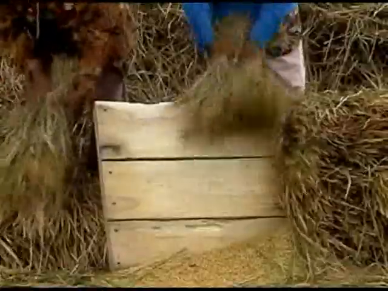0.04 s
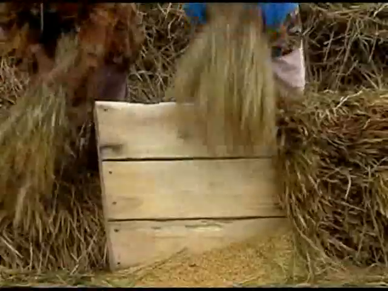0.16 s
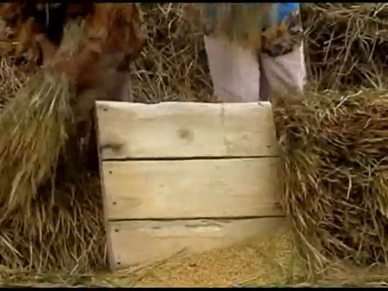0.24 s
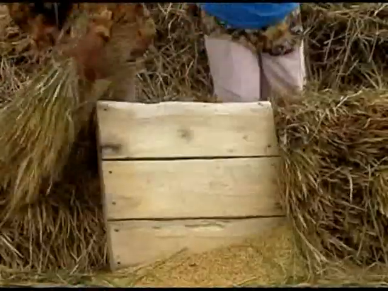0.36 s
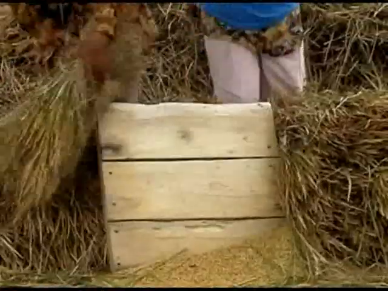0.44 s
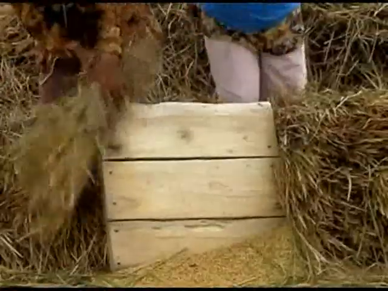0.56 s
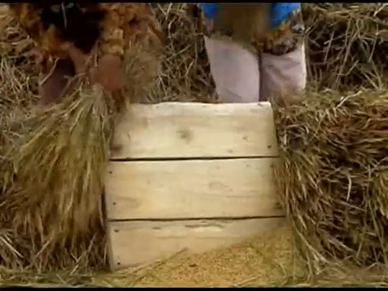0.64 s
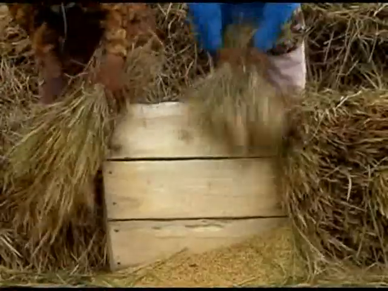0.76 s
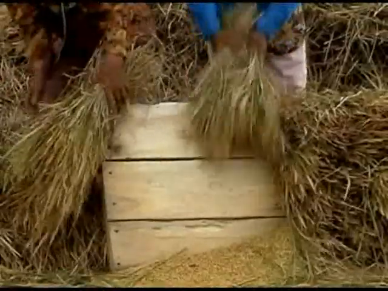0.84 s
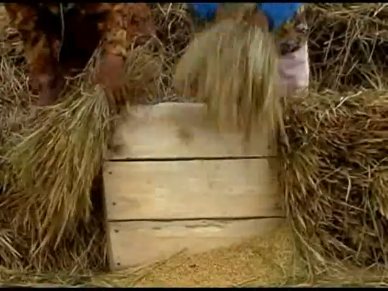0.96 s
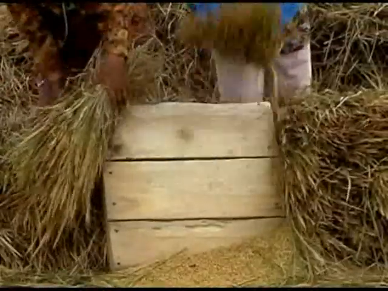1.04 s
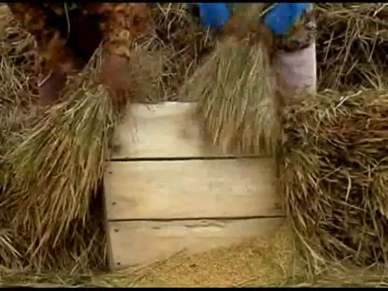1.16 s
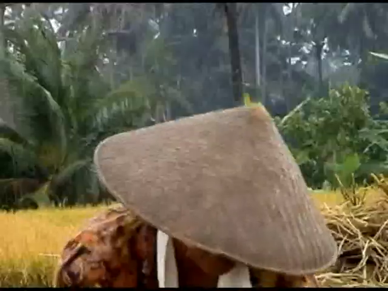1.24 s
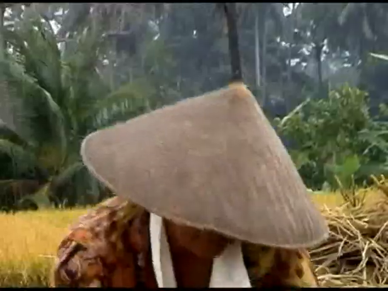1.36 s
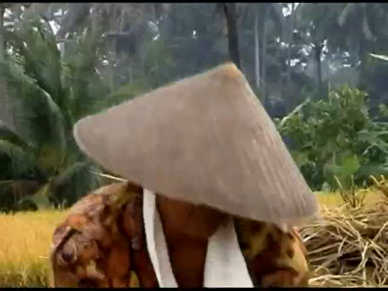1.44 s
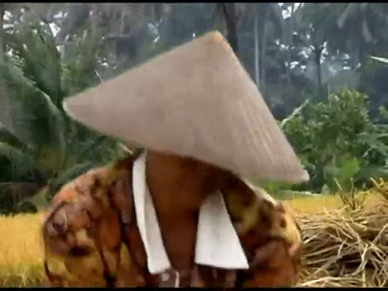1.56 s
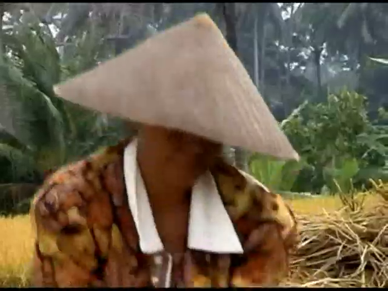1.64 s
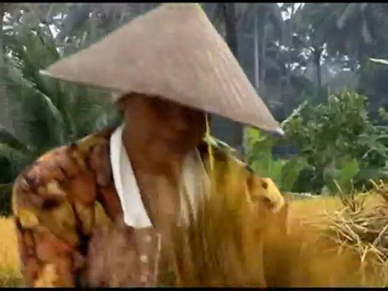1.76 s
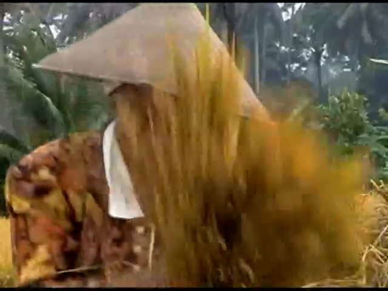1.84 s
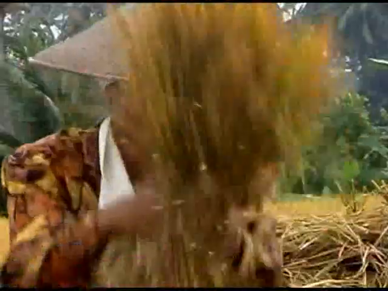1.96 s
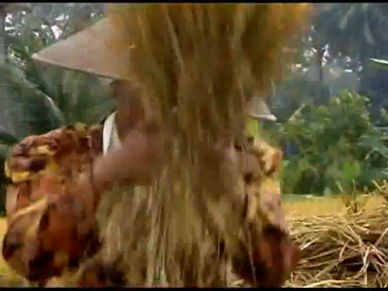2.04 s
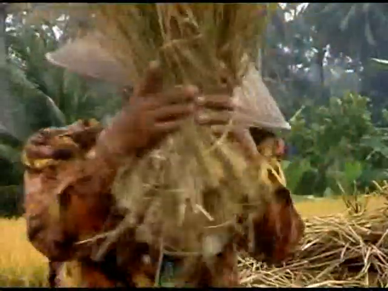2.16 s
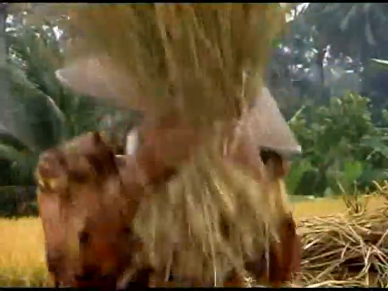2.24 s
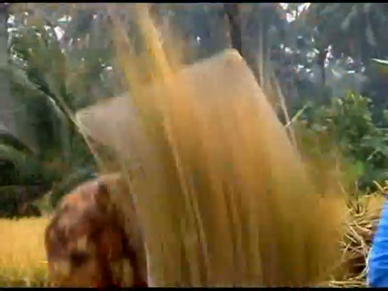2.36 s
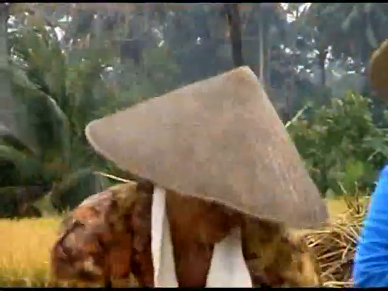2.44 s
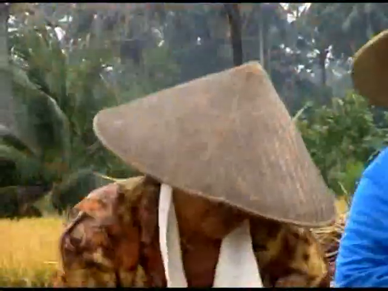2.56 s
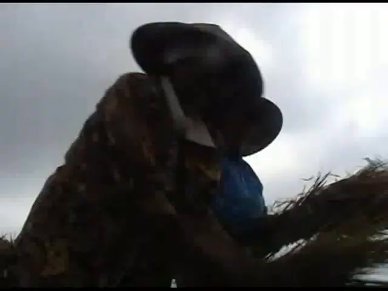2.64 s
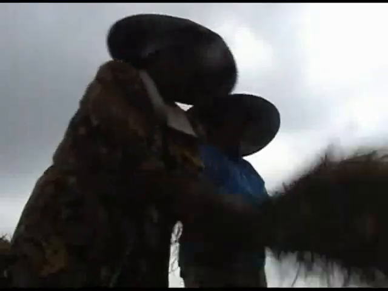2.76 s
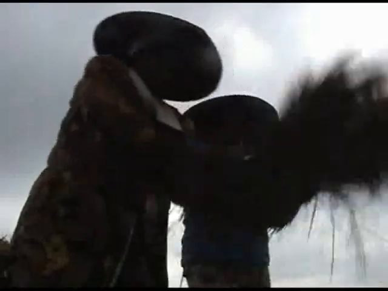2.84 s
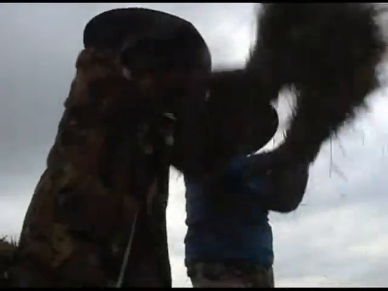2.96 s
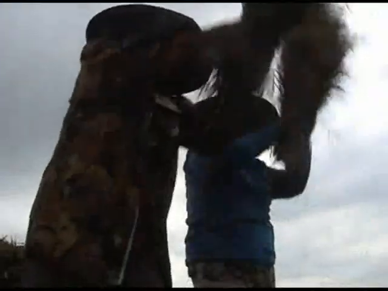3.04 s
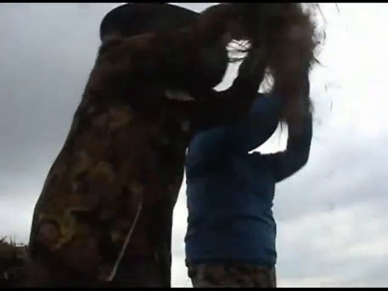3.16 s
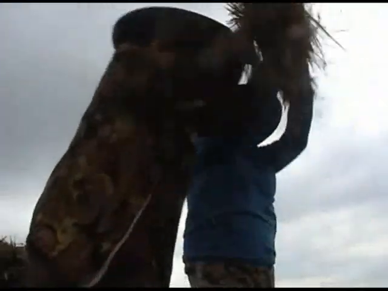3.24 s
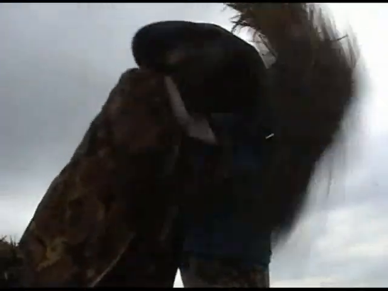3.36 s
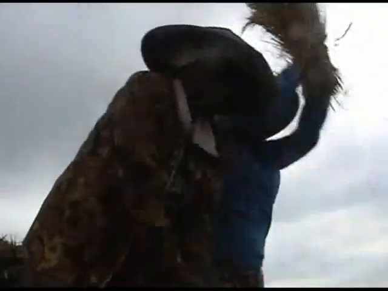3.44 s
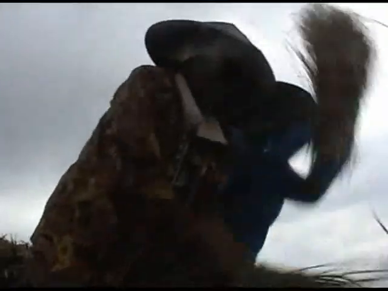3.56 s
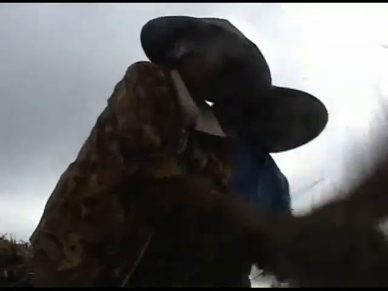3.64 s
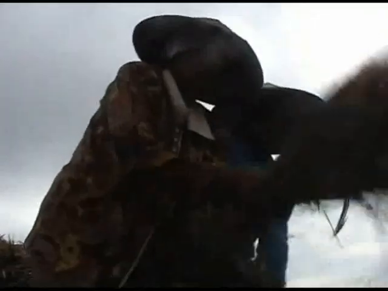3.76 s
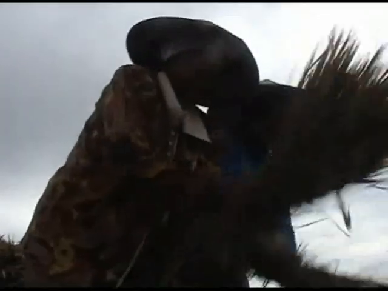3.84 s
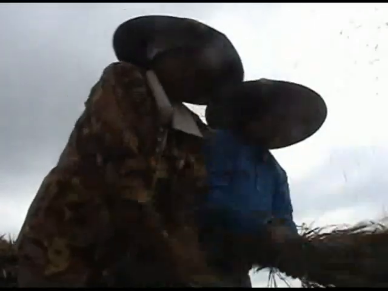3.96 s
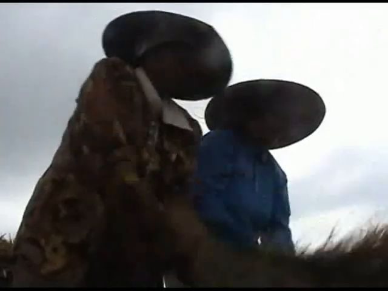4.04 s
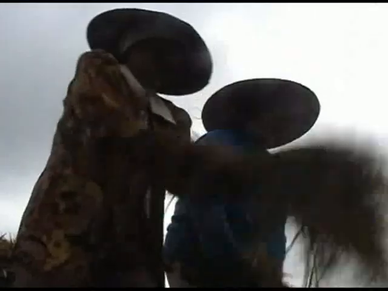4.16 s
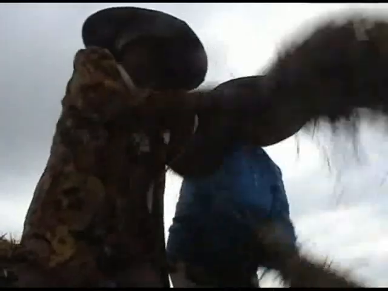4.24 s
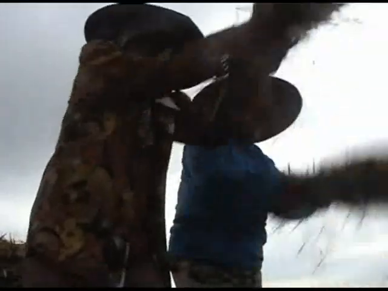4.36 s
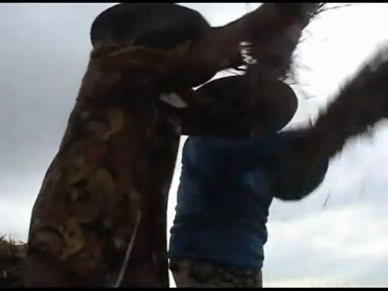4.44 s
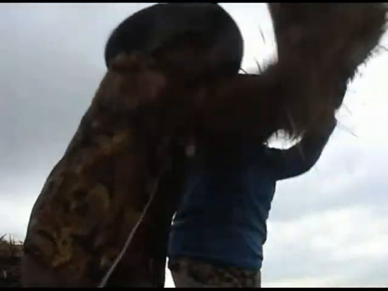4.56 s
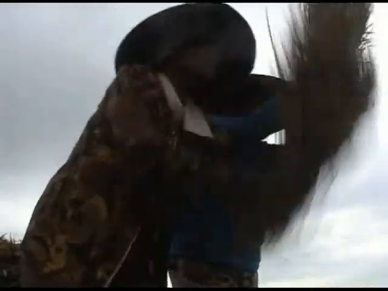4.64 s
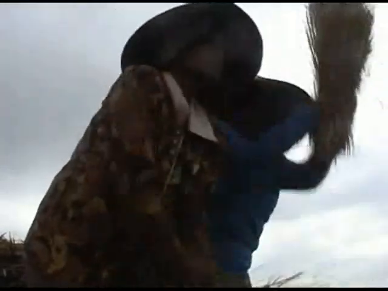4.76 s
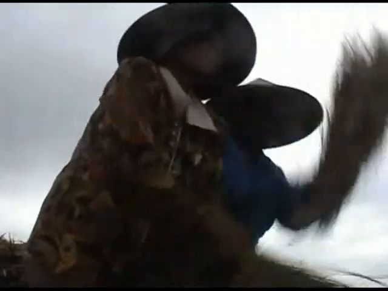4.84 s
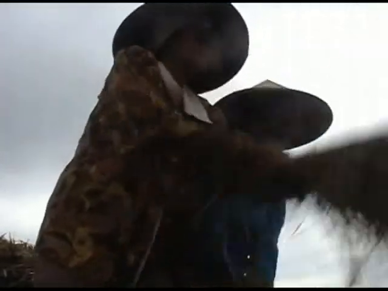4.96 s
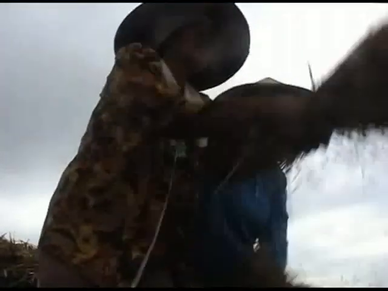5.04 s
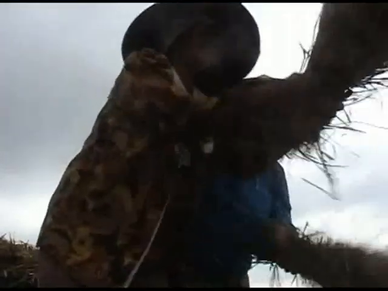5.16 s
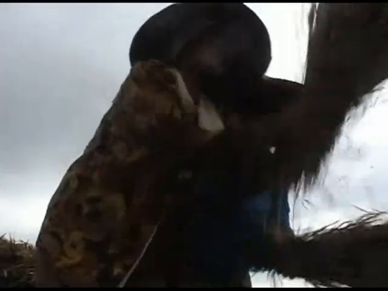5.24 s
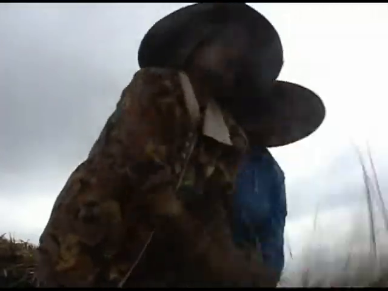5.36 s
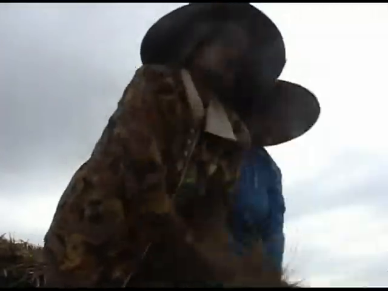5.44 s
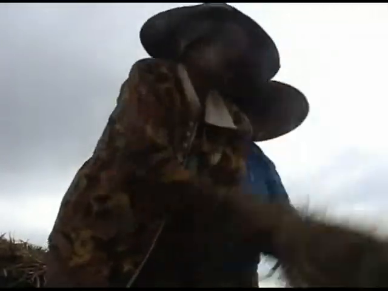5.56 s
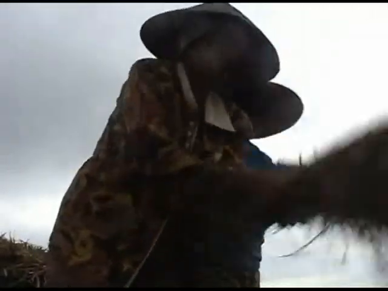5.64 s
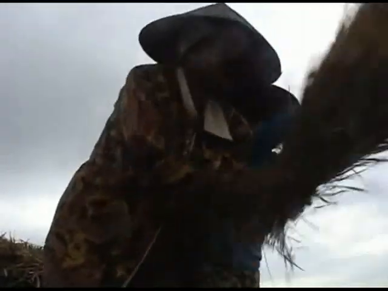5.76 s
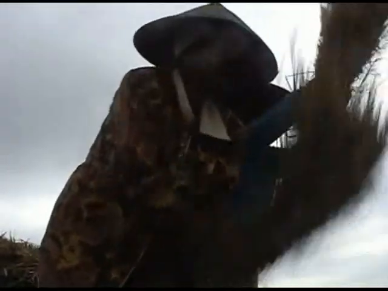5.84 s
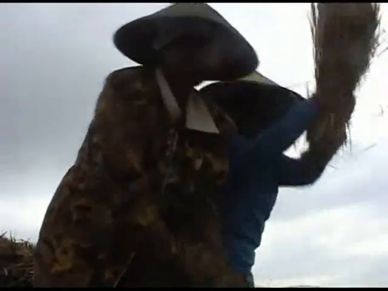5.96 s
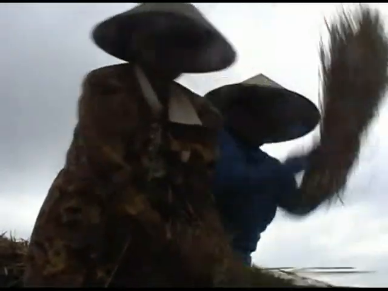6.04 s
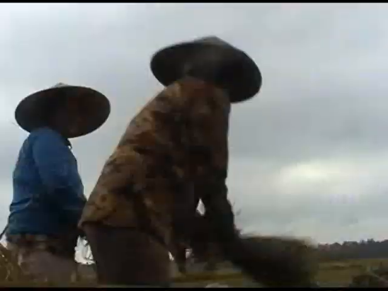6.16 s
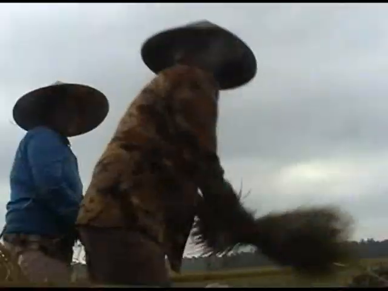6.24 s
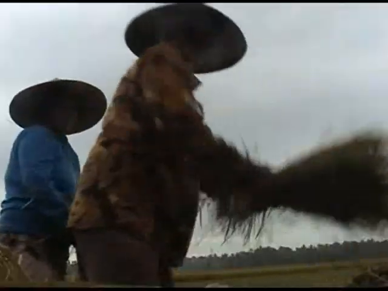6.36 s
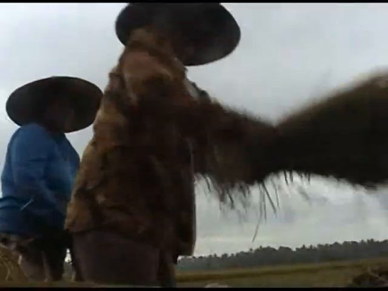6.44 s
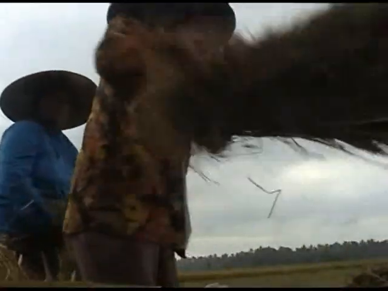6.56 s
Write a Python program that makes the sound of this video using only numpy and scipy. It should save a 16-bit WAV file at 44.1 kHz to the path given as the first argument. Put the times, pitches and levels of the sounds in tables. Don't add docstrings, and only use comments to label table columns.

```python
import sys
import numpy as np
from scipy import signal
from scipy.fft import rfft, irfft, next_fast_len
from scipy.io import wavfile
from scipy.ndimage import map_coordinates

SR = 44100
rng = np.random.default_rng(int(sys.argv[2]) if len(sys.argv) > 2 else 0)


def field_ratio(decibels):
    return 10 ** (np.asarray(decibels, dtype=float) / 20)


def transcribe(signal):
    frames = np.atleast_2d(signal).T
    limited = np.clip(frames, -1, 1)
    pcm = np.round(limited * 32767).astype(np.int16)
    wavfile.write(sys.argv[1], SR, pcm)


N = 290703
CUT_S = 6.207
TOP_HZ = 11015

# (time [s], level [dB], rise [ms], contact [ms], thud [dB])
SHEAF_BLOWS = [(.740, -16.5, 1.25, 11.5, 3.5), (1.118, -28, 6.2, 35, 1.5), (2.455, -15.5, 1.3, 20.7, -1.5),
               (2.481, -23.5, 1.2, 11.9, 5), (3.426, -15, 2.4, 21.6, 6.5), (3.693, -11, 2.3, 24.6, -2.5),
               (3.953, -25, 1.1, 26.5, -6.5), (4.094, -34, 13, 108, -1), (4.715, -13.5, 3.5, 17.6, 2),
               (4.933, -11.5, 3.3, 19.2, -6.5), (5.353, -35, 6.5, 19.5, -6),
               (5.379, -17.5, 6.2, 26.5, -0.5), (5.909, -23.5, 3.3, 35.3, 0), (6.163, -14, 2.7, 18.8, -4)]


def unit(x):
    return x / np.sqrt(np.mean(x ** 2) + 1e-20)


def along(points, hz):
    f, v = np.transpose(points)
    return np.interp(np.log(hz + 1), np.log(f + 1), v)


def curves(rows):
    s, *cols = np.transpose(rows)
    return [np.interp(np.arange(N) / SR, s, c) for c in cols]


def wobble(rate):
    knots = rng.standard_normal(int(N * rate / SR) + 4)
    return map_coordinates(knots, [np.arange(N) * rate / SR])


def filtered(x, response):
    m = next_fast_len(N + SR // 2)
    return irfft(rfft(x, m) * response(np.fft.rfftfreq(m, 1 / SR)), m)[..., :N]


def causal(points, top_hz):
    hz = np.fft.rfftfreq(2048, 1 / SR)
    db = along(points, np.minimum(hz, top_hz)) - 0.16 * np.maximum(hz - top_hz, 0)
    cep = irfft(np.log(field_ratio(np.maximum(db, -110))))
    folded = np.r_[cep[:1], 2 * cep[1:len(hz) - 1], np.zeros(len(hz))]
    return irfft(np.exp(rfft(folded)))


def band(lo_hz, hi_hz):
    return lambda f: (1j * f / (lo_hz + 1j * f) * hi_hz / (hi_hz + 1j * f)) ** 2


def modes(table):
    def response(f):
        total = 0
        for k, (hz, width, db) in enumerate(table):
            total = total + (-1) ** k * field_ratio(db) * 1j * f * width / (hz * hz - f * f + 1j * f * width)
        return total
    return response


def tone(hz, t, drift):
    wander = drift * np.cumsum(rng.standard_normal(len(t)))
    return np.sin(2 * np.pi * hz * t + wander + 2 * np.pi * rng.random())


def spray(rate, scatter_db, hiss):
    size = (rng.random(N) < rate / SR) * field_ratio(scatter_db * rng.standard_normal(N))
    impacts = unit(size * rng.standard_normal((2, N)))
    return unit(impacts + hiss * rng.standard_normal((2, N)))


def before_cut():
    return np.clip((CUT_S - np.arange(N) / SR) / 0.0033, 0, 1)


def blows():
    # (low plank tone [Hz], high plank tone [Hz], both tones [dB], panel [dB], brightness [dB])
    landings = [(508, 1623, -1, -1, 2.45), (730, 1300, -4.5, 1, 3.5), (527, 1100, -3.5, -2.5, 3.5),
                (568, 1670, 0.5, -1, 6.5), (810, 991, -4, -2, -0.5), (511.5, 1150, 1.5, 3, 0.7),
                (557, 1629, -1.5, 3.5, 1.1), (520, 1600, -5.5, 2.5, 2.1), (533, 1200, -2.5, -7.5, -0.5),
                (719, 935, -3, 7, -1.2), (514, 1730, 0.5, 0.5, 2.5), (840, 1000, -4.5, -6, -1),
                (469, 1200, -4, -3.5, -1), (537, 1158, 1.5, 3, -3)]
    # (frequency [Hz], width [Hz], level [dB])
    plank_modes = [(539, 35, 5.5), (690, 11, -3), (1030, 17, -9.5), (1183, 17, -19.5), (1566, 180, -9),
                   (1780, 63, -9)]
    # (frequency [Hz], width [Hz], level [dB])
    rocking = [(103, 25, 0)]
    t = np.arange(SR // 2) / SR
    force, treble, push, rings = np.zeros((4, N + SR))
    for (s, db, rise_ms, contact_ms, thud_db), spot in zip(SHEAF_BLOWS, landings):
        low_hz, high_hz, tone_db, panel_db, bright_db = spot
        rise, hold = rise_ms / 1000, contact_ms / 1000
        slow = 1 + 0.9 * max(hold / .025 - 1, 0)
        after = np.maximum(t - hold / slow ** 0.49, 0) / slow
        landing = field_ratio(-2.5 * np.maximum(1 - t / hold, 0)) * (1 - np.exp(-t / rise)) ** 3
        at = slice(round(s * SR), round(s * SR) + len(t))

        force[at] += landing * field_ratio(db) * (field_ratio(-60 * after / .034) + field_ratio(-19.5 - 60 * after / .21))
        bright = landing * field_ratio(db + bright_db)
        treble[at] += bright * (field_ratio(-60 * after / 0.035) + field_ratio(-21.0 - 60 * after / 0.25))
        push[at] += landing * field_ratio(db + thud_db - 60 * after / 0.014)

        low_level = field_ratio(db + tone_db - 12.5 - 60 * after / 0.042)
        high_level = field_ratio(db + tone_db - 7 - 60 * after / 0.065)
        panel_level = (1 - np.exp(-t / 0.0038)) * field_ratio(db + thud_db + panel_db - 18 - 60 * after / 0.14)
        rings[at] += landing * low_level * tone(low_hz, t, drift=.06)
        rings[at] += landing * high_level * tone(high_hz, t, drift=0.088)
        rings[at] += landing * panel_level * tone(223.2, t, drift=0.088)

    clumps = field_ratio(1.3 * wobble(400) + 1.34 * wobble(110))
    kernels = clumps * spray(rate=12000, scatter_db=1.0, hiss=0.7)
    low = lambda f: 1 / (1 + 1j * f / 5300) ** 2
    patter = filtered(force[:N] * kernels, low) + filtered(treble[:N] * kernels, lambda f: 1 - low(f))
    planks = field_ratio(-1.5) * filtered(force[:N] * kernels, modes(plank_modes))

    shove = push[:N] * (1 + .5 * wobble(500))
    rock = filtered(shove, lambda f: modes(rocking)(f) * band(lo_hz=50, hi_hz=900)(f) ** 2)
    thud = field_ratio(-2.5) * rock + field_ratio(5.9 * wobble(90)) * rings[:N]
    thud = filtered(thud, band(lo_hz=60, hi_hz=20000))
    wood = planks * [[1], [.5]] + thud * [[1], [.17]]
    return before_cut() * field_ratio(1.0) * patter, before_cut() * wood


def ticks():
    # (time [s], peak [dB], knock [dB], knock
    # [Hz])
    stray_kernels = [(0.071, -28.5, -4.5, 720), (0.193, -30, -18, 1010), (0.211, -28, -2, 1140),
                     (0.286, -28, -22, 756), (0.295, -23, -4.5, 1140), (0.355, -31, -24, 1110),
                     (0.378, -23.5, -8, 985), (0.423, -22.5, -11.5, 1170), (0.439, -18.5, -18, 1120),
                     (0.458, -25.5, -8.5, 654), (0.693, -29.5, -9, 1150), (0.781, -24, -19, 509),
                     (0.832, -22, -19, 1050), (0.845, -21, -11, 1160), (0.906, -28.5, -6, 1070),
                     (0.939, -18, -15, 690), (0.971, -28, -0.5, 1250), (0.987, -32, -1, 668),
                     (1.017, -18, -9, 670), (1.031, -26, -30, 770), (1.06, -30.5, -1, 1110),
                     (1.073, -26, -7, 1060), (1.085, -29.5, -15, 790), (1.121, -17.5, -16, 1110),
                     (1.183, -18.5, -10, 1270), (1.194, -23, -18, 1200), (1.207, -22, -19, 1400),
                     (1.22, -20, -19, 1010), (1.233, -21.5, -10, 533), (1.272, -21.5, -8.5, 544),
                     (1.465, -29, -30, 1164), (2.199, -29.5, -8, 1140), (2.669, -20, -18, 1130),
                    (3.298, -47, 2, 966), (4.029, -26, -9, 873), (4.243, -25, -19, 454),
                    (4.263, -29, -15, 1080), (4.298, -24.5, -14, 495), (4.361, -25.5, -12, 452),
                    (4.397, -24, -9, 1430), (4.447, -27, -35, 1260), (4.522, -27.5, -10, 1410),
                    (4.553, -31, -16, 466), (4.625, -25, -11, 1280), (4.641, -26.5, -10, 1390),
                    (5.148, -26, -10, 1410), (5.337, -31, -9, 1380), (5.706, -34, -12, 1020),
                    (5.773, -30, -4.5, 950), (5.824, -31.5, -7, 1040), (5.863, -28, -23.5, 1280),
                    (6.04, -26, -16, 844), (6.265, -48.5, -15, 732), (6.291, -45, -12, 493),
                    (6.306, -51.5, -19, 991), (6.383, -46.5, -18.5, 1007), (6.479, -47, -20.5, 1068),
                    (6.539, -41.5, -15, 1366)]
    # (time [s], level [dB])
    faint_patter = [(0, -46), (.8, -45), (1.08, -42), (1.17, -30.5), (1.26, -39), (1.35, -47), (2.8, -55),
                    (3.4, -54), (4.3, -38.5), (4.7, -45), (5.2, -46), (5.6, -41.5), (5.9, -40),
                    (6.19, -52.5), (6.21, -67.5), (6.59, -63)]
    out = np.zeros((2, N + SR))
    t = np.arange(SR // 20) / SR

    faint_db, = curves(faint_patter)
    per_s = 55 * field_ratio(.8 * (np.maximum(faint_db, -55) + 45))
    at = np.flatnonzero(rng.random(N) < np.minimum(per_s, 130) / SR)
    luck = rng.random((len(at), 2))
    faint_peak_db = faint_db[at] + 13 * luck[:, 0] ** 1.5
    faint = np.c_[at / SR, faint_peak_db, -9 + 0 * at, 500 + 800 * luck[:, 1]]

    for s, db, knock_db, knock_hz in [*stray_kernels, *faint]:
        hz = 2468 * field_ratio(1.26 * rng.standard_normal())
        die = field_ratio(-60 * t / 0.0103) * (1 - np.exp(-t / .0003))
        skips = sum(share * np.roll(die, round(rng.uniform(.002, .007) * SR)) for share in (.28, .15))
        ring = np.array([tone(hz, t, drift=.25), tone(hz, t, drift=.25)])
        knock = np.sin(2 * np.pi * knock_hz * t) * die ** 0.49
        crack = rng.standard_normal((2, len(t)))
        kernel = (die + skips) * (1.06 * ring + 1.27 * crack) + field_ratio(knock_db + 0.5) * knock
        out[:, round(s * SR):][:, :len(t)] += field_ratio(db - 0.2) * kernel

    dull = lambda f: field_ratio(np.maximum(-.02 * np.maximum(f - 4200, 0), -19)) * (f < TOP_HZ)
    near = filtered(out[:, :N], lambda f: band(lo_hz=350, hi_hz=9000)(f) * dull(f))
    far = filtered(near, lambda f: 1 / (1 + 1j * f / 3780) ** 2)
    return np.where(np.arange(N) / SR < 3.33, near, field_ratio(1) * far)


def handling():
    # (time [s], stalks rubbing [dB], weight dragged over the ground [dB])
    sheaf_moves = [(0, -40, -53), (.1, -48.5, -61.5), (.36, -55, -61.5), (.67, -48.5, -59),
                   (1.26, -54, -58), (1.44, -45.5, -61), (1.65, -54, -62), (2.26, -49.5, -63.5),
                   (2.66, -46.5, -61), (2.84, -58.5, -68), (3.29, -55, -68.5), (3.4, -49.5, -68.5),
                   (4.35, -46.5, -51.5), (4.65, -52.5, -59), (5.3, -54, -64), (5.55, -48.5, -56),
                   (6.2, -55.5, -62.5), (6.59, -43.5, -61.5)]
    rub_db, drag_db = curves(sheaf_moves)
    late = np.arange(N) / SR - np.array(SHEAF_BLOWS)[:, :1]
    blow_db = np.array(SHEAF_BLOWS)[:, 1:2]
    settle_s, swing_s = 2.3, 0.33
    loose = field_ratio(blow_db - 37 - 60 * np.maximum(late / settle_s, -late / swing_s)) ** 2
    return 10 * np.log10(field_ratio(rub_db) ** 2 + before_cut() * loose.sum(axis=0)), drag_db


def takes():
    # (from [s], gain [dB], far drone [dB], fizz [dB], air of close sheaves [dB])
    positions = [
        (0, -0.5, -62.5, -1, -24),
        (1.35, 0, -68, -3.5, -25),
        (2.689, -4, -64, -2.5, -18.5),
        (3.33, -0.5, -67, -2, -4),
        (5.6, -0.5, -66.5, -2, -12.5),
        (6.207, -19, -60.5, -3.5, -13),
    ]
    s, *cols = np.transpose(positions)
    return np.array(cols)[:, np.searchsorted(s, np.arange(N) / SR, side="right") - 1]


def straw(mic):
    # (frequency [Hz], level [dB])
    ground_tint = [(65, -42), (110, -11), (199, -2), (262, -2.5), (296, -5), (400, -10.5), (520, -35),
                   (880, -120)]
    gain_db, drone_db, fizz_db, air_db = takes()
    rub_db, drag_db = handling()
    fizz_db = fizz_db + rub_db - 0.28 * (drag_db - drag_db.mean())
    body_db = 0.65 * rub_db + 0.35 * drag_db - 2.5
    stir = .8 * wobble(20) + 1.2 * wobble(70)
    out = np.zeros((2, N))
    # (level [dB], low edge [Hz], high edge [Hz], crackles a second)
    layers = [(rub_db, 1500, 5200, 2500), (fizz_db, 5200, 12000, 6000),
              (body_db, 350, 1500, 900), (fizz_db + air_db, 9600, 12000, 7000)]
    for db, lo_hz, hi_hz, rate in layers:
        crackle = spray(rate, scatter_db=0.5, hiss=1.7)
        crackle = signal.fftconvolve(crackle, mic[None], axes=1)[:, :N]
        skirts = lambda f: 1 / ((1 + (lo_hz / (f + 1)) ** 8) * (1 + (f / hi_hz) ** 8)) ** .5
        out += field_ratio(db + stir + 0.55 * wobble(25)) * unit(filtered(crackle, skirts))
    ground = filtered(rng.standard_normal((2, N)), lambda f: field_ratio(along(ground_tint, f)))
    drone = filtered(rng.standard_normal((2, N)), lambda f: modes([(88, 75, 0)])(f) ** 2)
    lumps = 2.6 * wobble(35) - .8
    return field_ratio(gain_db) * (out + field_ratio(drag_db + lumps) * unit(ground) + field_ratio(drone_db) * unit(drone))


def birds():
    # (time [s], frequency [Hz], level [dB])
    whistles = [
        [(.305, 4250, -62), (.325, 3980, -61), (.385, 3850, -63)],
        [(1.6, 3430, -66), (1.632, 3600, -62), (1.652, 4300, -57), (1.7, 4260, -58), (1.76, 4040, -58),
         (1.815, 3650, -59)],
        [(2.35, 4280, -55), (2.4, 4450, -53), (2.43, 4380, -53), (2.47, 4200, -52)],
    ]
    # (time [s], frequency [Hz], level [dB])
    coo = [
        (1.98, 732, -69),
        (2.01, 738, -64),
        (2.09, 743, -59.5),
        (2.16, 735, -67),
    ]
    out, t = np.zeros(N), np.arange(N) / SR
    for call in [*whistles, coo]:
        hz, db = curves(call)
        gate = np.clip(np.minimum(t - call[0][0], call[-1][0] - t) / 0.011, 0, 1)
        blur = 1 + .5 * wobble(90)
        phase = 2 * np.pi * np.cumsum(hz * (1 + 0.008 * wobble(45))) / SR
        out += gate * blur * field_ratio(db + 4.0) * np.sin(phase)
    return np.array([out, .7 * out])


def scene():
    # (frequency [Hz], level [dB])
    mic_tint = [(150, -40.5), (330, -13), (520, -1), (1000, -4), (1600, -2), (3000, 4), (3600, 0.5),
                (4250, -4.5), (4950, -16), (6000, -14), (7200, 0), (8150, -10.5), (10500, -3.5),
                (11200, -2)]
    # (frequency [Hz], side minus mid [dB])
    side_tint = [(60, -5), (300, -14), (1000, -15.5), (2500, -10.5), (4200, -9.5), (4800, 1), (6100, 2),
                 (6700, -7.5), (9000, -4.5), (11000, -6.5)]
    # (frequency [Hz], left minus right [dB])
    balance = [(100, 0), (2000, -1), (3000, 0.5), (4500, 2.5), (6500, -2.5), (7400, -2), (8800, 0.5),
               (11000, 1)]
    mic = causal(mic_tint, TOP_HZ)
    mic = mic / np.linalg.norm(mic)
    patter, wood = blows()
    patter = signal.fftconvolve(patter, mic[None], axes=1)[:, :N]
    mid, side = patter + wood + ticks() + straw(mic) + birds()
    side = filtered(side, lambda f: field_ratio(along(side_tint, f)))
    both = np.array([mid + side, mid - side])
    return filtered(both, lambda f: field_ratio(np.outer([.5, -.5], along(balance, f))))


def roll_off(x):
    return signal.sosfilt(signal.butter(12, 12290, fs=SR, output="sos"), x)


def record(dry):
    drum_hz = 300

    def notches(f, shift, depth, memory):
        lap = np.exp(-1j * np.pi * (f / drum_hz - shift))
        return 1 - depth * (1 - memory) * lap / (1 - memory * lap) * (f > drum_hz / 2)

    def canceller(f):
        even = notches(f, shift=0, depth=0.68, memory=.86)
        odd = notches(f, shift=0.97, depth=0.54 / (1 + (f / 4700) ** 16), memory=0.79)
        return even * odd * (f < TOP_HZ + 250) * band(lo_hz=25, hi_hz=90000)(f)

    before = before_cut()
    x = before * filtered(dry, canceller) + filtered((1 - before) * dry, canceller)
    x = x / (1 + np.abs(x / .99) ** 12) ** (1 / 12)
    return roll_off(x)


dry = scene()
out = record(dry)
transcribe(out)
```